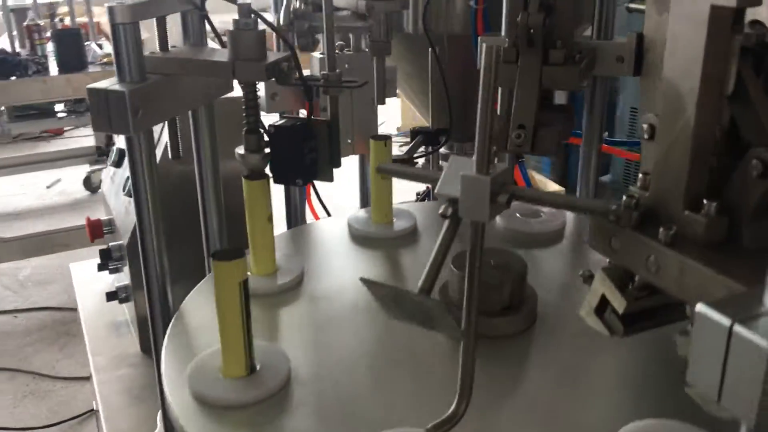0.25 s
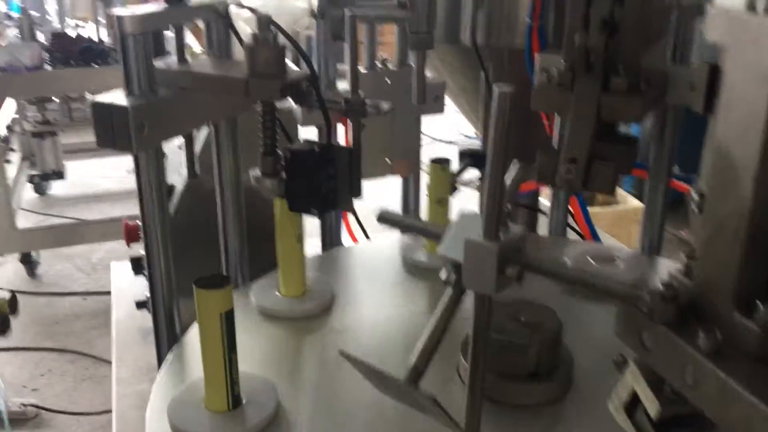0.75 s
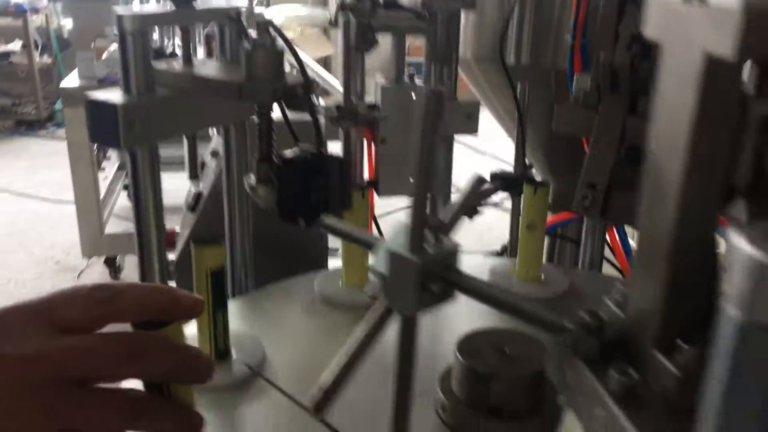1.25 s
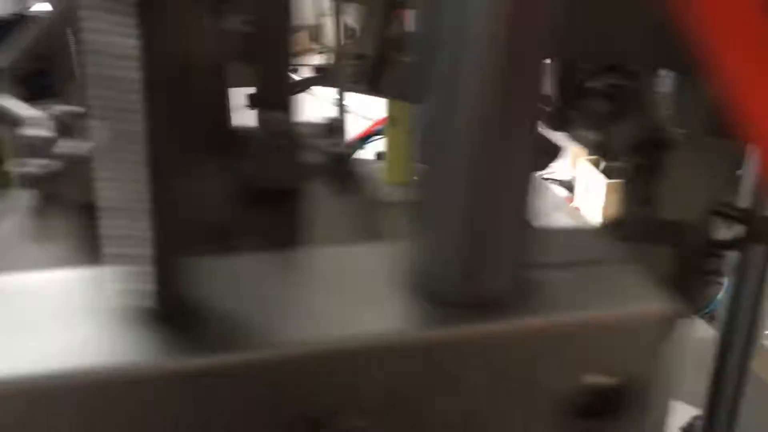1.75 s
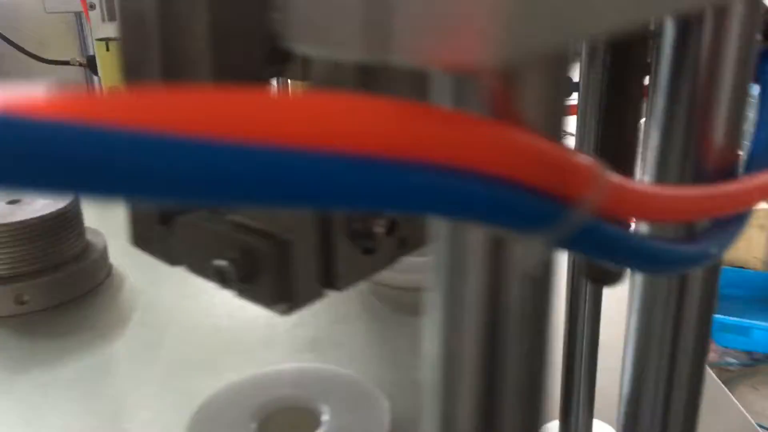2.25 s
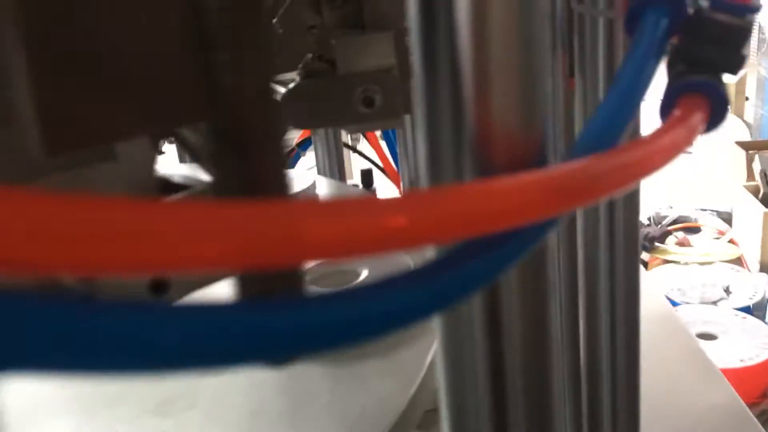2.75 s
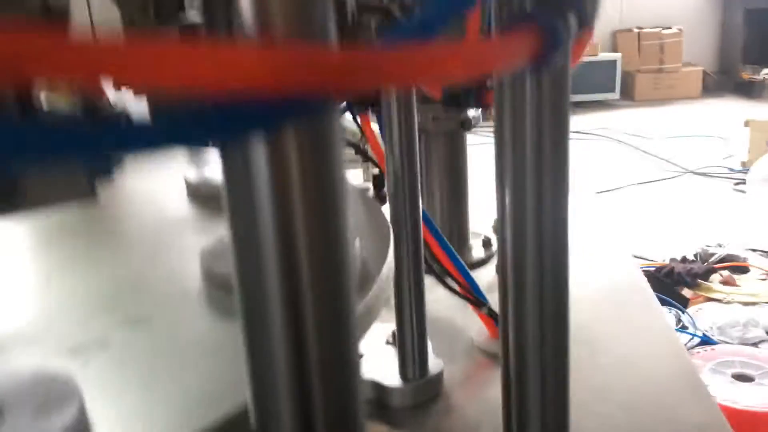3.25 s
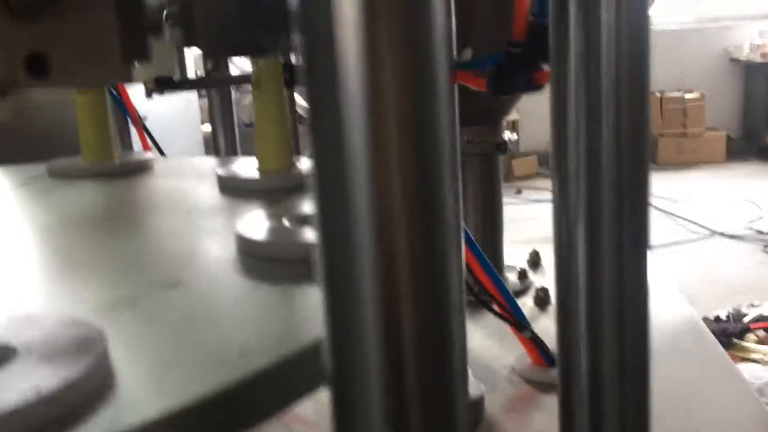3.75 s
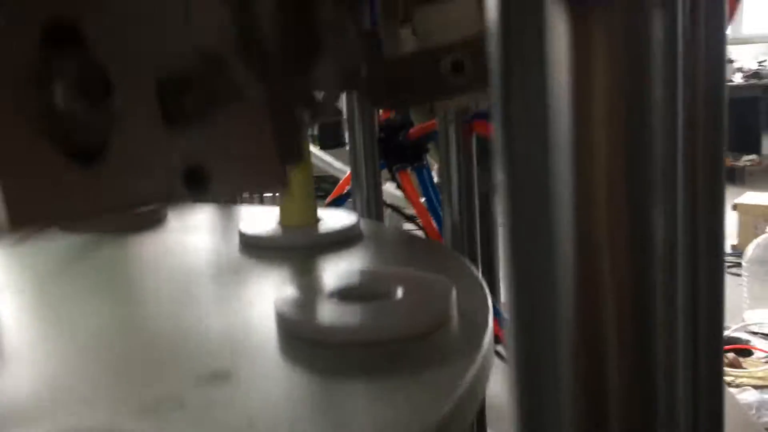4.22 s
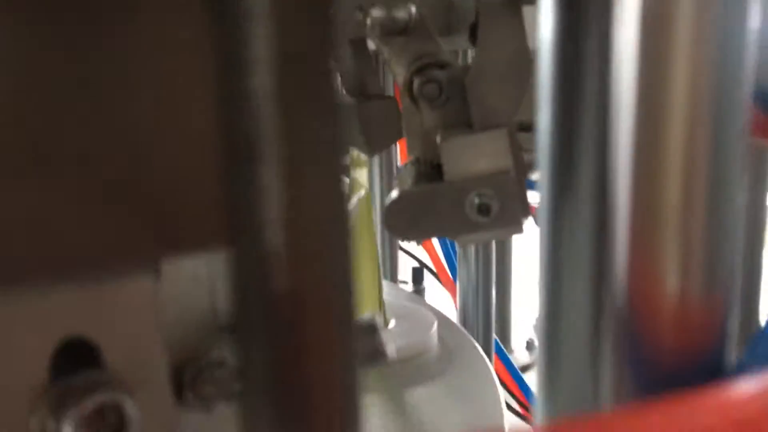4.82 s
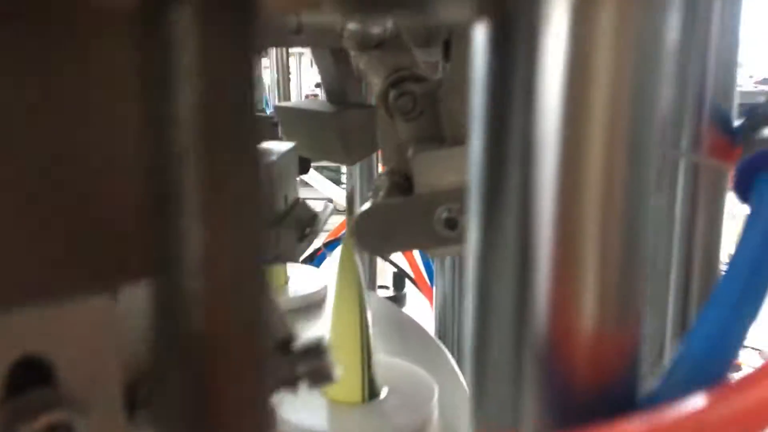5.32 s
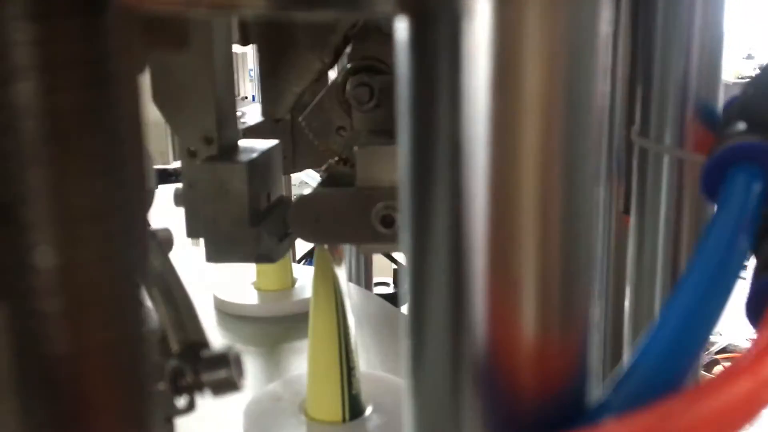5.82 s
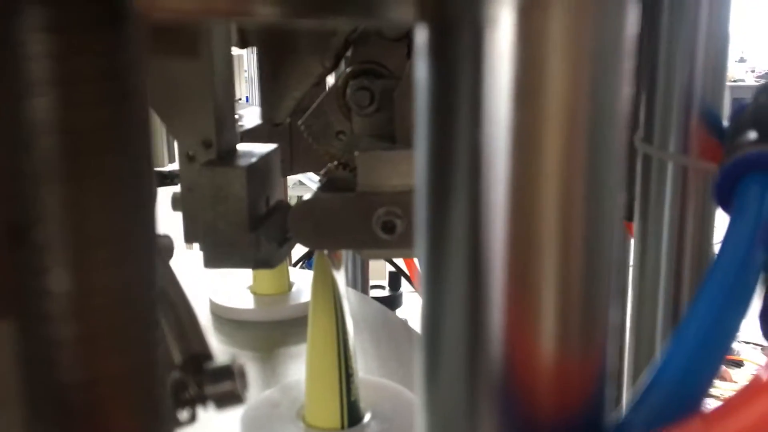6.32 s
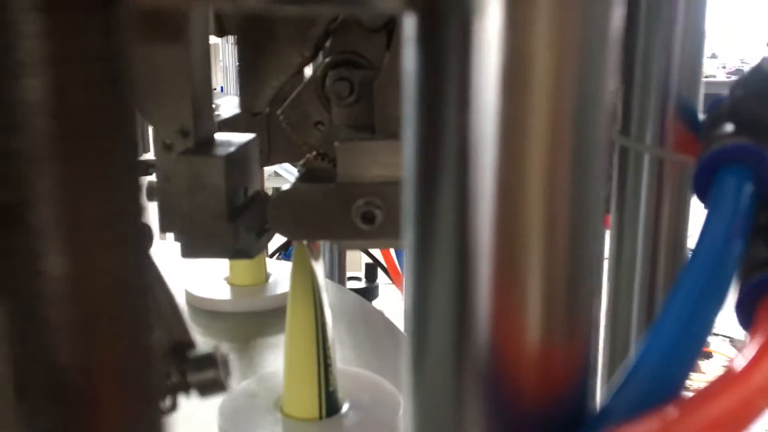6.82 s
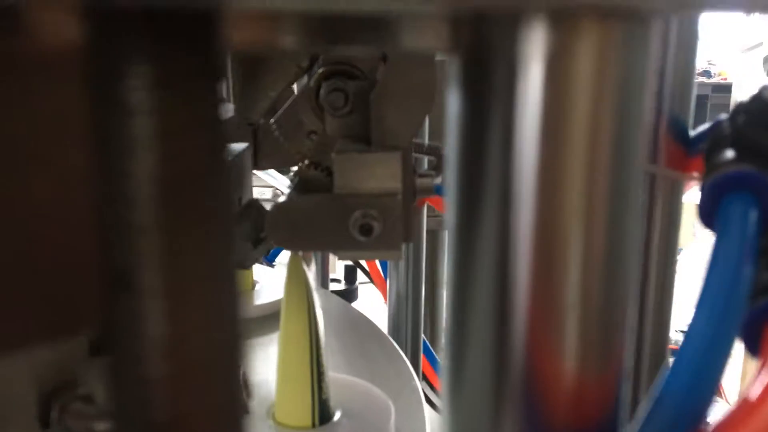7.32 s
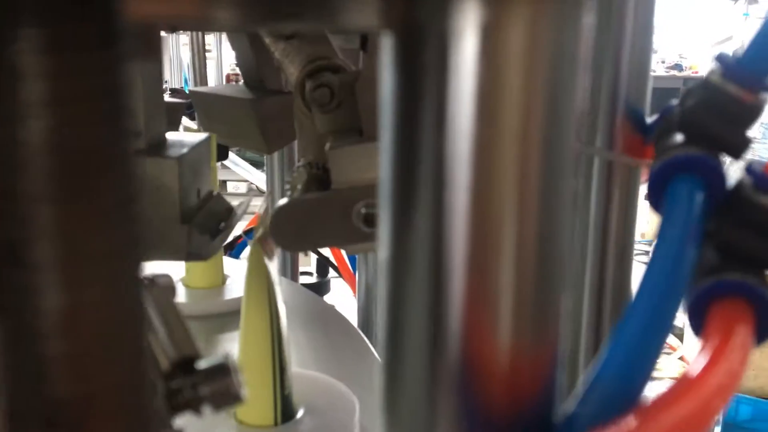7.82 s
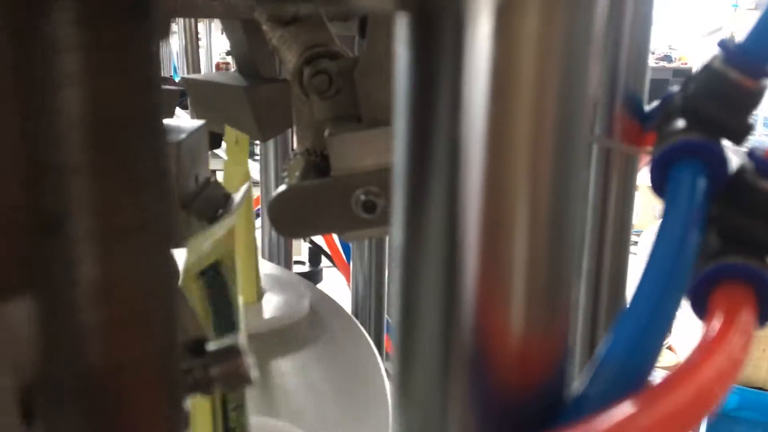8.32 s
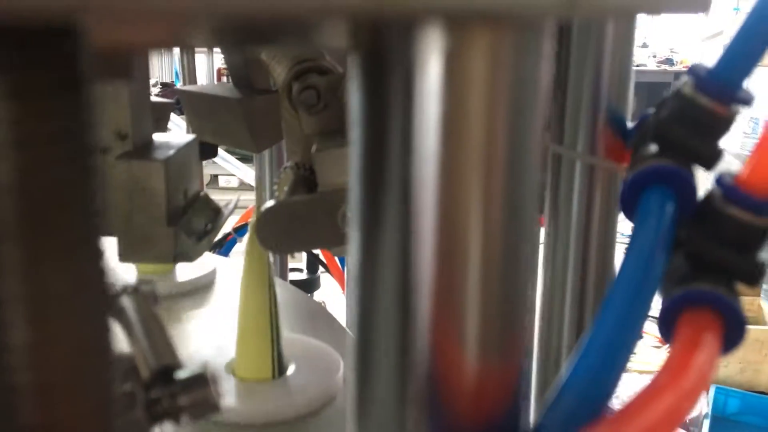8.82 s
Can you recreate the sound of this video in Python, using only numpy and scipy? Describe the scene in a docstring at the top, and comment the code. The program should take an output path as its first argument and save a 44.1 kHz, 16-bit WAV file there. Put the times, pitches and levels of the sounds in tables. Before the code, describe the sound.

An air-driven machine alternates two strokes: a lifting blast with a bright jaw clank and hard landing blows, then a pressing blast with clank and rapid metallic slams. Short spurts of air and a few dry hollow ticks fill the gaps. The microphone is very close, the impacts abrupt and nearly overloading, with the large hall ringing behind and constant soft rumble, hum and thin whine.

```python
"""Factory hall: a rotary tube filling and sealing machine runs, heard from close by.
Each cycle has two strokes: the stations lift off the tubes, then press down on them. At each stroke a valve
dumps air (coloured noise), jaws clank (damped modes) and cylinders slam home on the steel frame (noise bursts).
Hollow taps (modes and ticks) and small puffs (noise) fall in between, over rumble, motor hum and drive whine."""
import sys
import numpy as np
from scipy import signal
from scipy.fft import rfft, irfft, next_fast_len
from scipy.io import wavfile
from scipy.ndimage import uniform_filter1d, minimum_filter1d, map_coordinates

SR = 44100
rng = np.random.default_rng(int(sys.argv[2]) if len(sys.argv) > 2 else 0)


def materialize(psi):
    """Save the field psi as 16-bit PCM at rate SR to the path in sys.argv[1].

    A 1-D psi becomes a single channel; in a 2-D psi each row is a channel.
    """
    bounded = np.clip(np.atleast_2d(psi).T, -1, 1)
    quanta = np.round(bounded * 32767).astype(np.int16)
    wavfile.write(sys.argv[1], SR, quanta)


N = 399987
CYCLE_S, FIRST_LIFT_S, FIRST_PRESS_S = 3.656, 0.083, 1.904


def amp(db):
    """Decibels to gain."""
    return 10 ** (np.asarray(db) / 20)


def unit(x):
    """Scale to rms 1."""
    return x / np.sqrt(np.mean(x ** 2) + 1e-20)


def along(points, hz):
    """Interpolate (Hz, value) points on a log frequency axis."""
    point_hz, values = np.transpose(points)
    return np.interp(np.log(hz + 1), np.log(point_hz + 1), values)


def filtered(x, response):
    """Multiply the spectrum of x by a response, a function of Hz."""
    size = x.shape[-1]
    padded = next_fast_len(size + 8192)
    hz = np.fft.rfftfreq(padded, 1 / SR)
    return irfft(rfft(x, padded) * response(hz), padded)[:size]


def noise(spectrum, size):
    """Noise of rms 1, shaped by (Hz, relative dB) points."""
    return unit(filtered(rng.standard_normal(size), lambda hz: amp(along(spectrum, hz))))


def bump(hz, centre_hz, width_hz):
    """A resonance peak of height 1."""
    return 1 / (1 + (2 * (hz - centre_hz) / width_hz) ** 2)


def boom(modes, size):
    """Noise of rms 1 ringing in (Hz, width Hz, dB) resonances; the deepest bass does not radiate."""
    def response(hz):
        resonances = sum(amp(db) * bump(hz, centre_hz, width_hz) for centre_hz, width_hz, db in modes)
        return resonances * hz ** 4 / (hz ** 4 + 45 ** 4)
    return unit(filtered(rng.standard_normal(size), response))


def wobble(knots_per_s):
    """A smooth random curve through random knots."""
    knots = rng.standard_normal(int(N * knots_per_s / SR) + 4)
    return map_coordinates(knots, [np.arange(N) * knots_per_s / SR])


def flutter(size, depth_db, knots_per_s):
    """An uneven gain of rms 1."""
    knots = rng.standard_normal(int(size * knots_per_s / SR) + 2)
    position = np.arange(size) * knots_per_s / SR
    return unit(amp(depth_db * np.interp(position, np.arange(len(knots)), knots)))


def fade(t, attack_s, t60_s):
    """A quick rise and an exponential decay."""
    return (1 - np.exp(-t / attack_s)) * np.exp(-np.log(1000) * t / t60_s)


def ring(modes, t):
    """Damped (Hz, dB, t60 s) modes, struck at slightly new strengths each time."""
    total = np.zeros(len(t))
    for hz, db, t60_s in modes:
        strength = amp(db + rng.normal())
        total += strength * fade(t, 0.00038, t60_s) * np.sin(2 * np.pi * (hz * t + rng.random()))
    return total


def add(track, start_s, sound):
    """Mix a sound into the track."""
    part = track[max(round(start_s * SR), 0):][:len(sound)]
    part += sound[:len(part)]


def strokes(first_s):
    """The times at which one kind of stroke comes round."""
    return np.arange(first_s, N / SR, CYCLE_S)


def every_cycle(first_s, pattern):
    """A stroke's events, repeated each cycle."""
    return [(start_s + delay_s, *rest) for start_s in strokes(first_s) for delay_s, *rest in pattern]


# Exhaust muffler spectrum. Each row: frequency in Hz, relative density in dB.
MUFFLER_SPECTRUM = [(120, -64), (200, -5.5), (304, -7), (516, -10), (1540, -6.5), (1690, -9.5), (1950, -6),
                    (2660, -6), (4350, -2), (4950, -4.5), (6870, -1), (7800, -4), (8870, -5.5),
                    (14000, -7.5), (15600, -10)]
# Exhaust port resonances. Each row: centre in Hz, width in Hz, gain in dB before the stroke's colour factor.
PORT_RESONANCES = [(4300, 160, 2.5), (4450, 77, 0.5), (7000, 460, 1.5), (7650, 1970, -5), (8520, 310, 6),
                   (9250, 120, 6.5), (10400, 400, 1), (11100, 80, 4), (11300, 90, 5.5), (14090, 100, 4)]
# Frame recoil as the valve opens. Each row: frequency in Hz, relative level in dB, t60 in s.
KICK_MODES = [(77.6, 2.5, 0.09), (120, -7.5, 0.081), (176, -11.5, 0.13), (274, 0.5, 0.02), (560, 8, 0.012)]
# Main exhaust per stroke. Columns: level in dB, open time in s, pressure fall in dB/s,
# kick in dB relative to the level, port colour factor.
LIFT_AIR = (-23.5, 0.3245, 17.5, 2, 1.32)
PRESS_AIR = (-22.5, 0.2948, 23.5, 5.5, 0.9)


def exhaust(lead_s=0.035, opening_db_per_s=700, closing_db_per_s=190, surge_db=2.5, flutter_db=1.5):
    """The valve opens with a kick; the jet weakens as the pressure falls, then shuts."""
    out, t = np.zeros(N), np.arange(SR) / SR
    age_s = t - lead_s
    for first_s, air in ((FIRST_LIFT_S, LIFT_AIR), (FIRST_PRESS_S, PRESS_AIR)):
        level_db, open_s, fall_db_per_s, kick_db, colour = air
        flow_db = opening_db_per_s * np.minimum(age_s, 0) - fall_db_per_s * age_s
        flow_db -= closing_db_per_s * np.maximum(age_s - open_s, 0)
        flow_db += surge_db * np.exp(-np.abs(age_s) / 0.019)

        def port(hz):
            return amp(colour * sum(db * bump(hz, centre, width) for centre, width, db in PORT_RESONANCES))

        for stroke_s in strokes(first_s):
            jet = filtered(noise(MUFFLER_SPECTRUM, len(t)), port)
            jet *= flutter(len(t), flutter_db, knots_per_s=120)
            add(out, stroke_s - lead_s, amp(level_db + flow_db) * jet)
            kick = ring(KICK_MODES, t) * (1 - np.exp(-t / 0.0058))
            add(out, stroke_s - 0.011, amp(level_db + kick_db) * kick)
    return out


# Stops hit on every such stroke. Each row: delay after the valve opens in s, blow level in dB, hardness 0-1,
# rattle t60 in s, strongest ring in Hz.
LIFT_STOPS = [(.113, -20, 0.52, 0.06, 1420), (0.281, -24, 0.26, 0.094, 1170)]
PRESS_STOPS = [(0.054, -22, 0.65, 0.076, 1170), (.207, -15.5, 0.44, 0.27, 1050),
               (.296, -12, 0.41, 0.094, 950), (.319, -12.5, 0.79, 0.08, 1260), (.381, -9.5, .98, .12, 627),
               (.561, -20, .08, 0.15, 1061)]
# Lifted head landing in a few blows, different each time. Each row: start in s, then as for the stops.
LANDINGS = [(.435, -17.5, .35, 0.32, 1630), (.472, -11.5, 0.67, 0.11, 850), (.509, -19.5, .05, .14, 650),
            (.535, -12.5, 0.91, 0.096, 3270), (4.097, -9, 0.55, 0.092, 960),
            (4.130, -6.5, 0.76, 0.094, 677), (4.154, -21, 0.04, 0.3, 716), (4.191, -10.5, 0.9, 0.048, 1890),
            (7.794, -6, 0.66, .06, 1620), (7.858, -4.5, 0.77, 0.14, 900), (7.916, -6.5, 0.46, 0.23, 1014)]
# What a blow of hardness 0 and 1 sets off. Columns: base boom, frame thud, crack, in dB before their trims.
SOFT_BLOW = (-0.8, 5.4, -29)
HARD_BLOW = (-22, -12, 1.5)
# Linkage and crack spectra. Each row: frequency in Hz, relative density in dB.
LINKAGE_SPECTRUM = [(200, -10), (400, -1), (480, -6), (630, 7), (820, -2), (990, 3), (1300, -0.5),
                    (1900, 0.5), (2600, -2.5), (3300, -9), (6000, -14), (12000, -21)]
CRACK_SPECTRUM = [(1000, -70), (3000, 14.5), (6000, 15), (10000, 9), (16000, 10)]
# Resonances of machine base and steel frame. Each row: centre in Hz, width in Hz, relative level in dB.
BASE_RESONANCES = [(64.3, 6, 2), (88.8, 28, 9.5), (131.4, 16, -1.5)]
FRAME_RESONANCES = [(184.8, 34, 1.5), (254, 34, 2.5), (310.4, 31, 3.5), (334, 26, -6), (385, 74, -12.5),
                    (464, 130, -17)]


def slams(base_trim_db=-5, thud_trim_db=-4, rattle_db=-5, impact_db=-1, crack_trim_db=-3, base_t60_s=0.75,
          thud_t60_s=0.31, impact_t60_s=0.018, crack_t60_s=0.031, ring_db=10, sharpness=6):
    """A piston hits its stop: hard impact, linkage rattle, frame thud, slow base boom, crack."""
    out, t = np.zeros(N), np.arange(SR // 2) / SR
    blows = every_cycle(FIRST_LIFT_S, LIFT_STOPS) + every_cycle(FIRST_PRESS_S, PRESS_STOPS) + LANDINGS
    for start_s, level_db, hardness, rattle_t60_s, ring_hz in blows:
        mix_db = np.array(SOFT_BLOW) + np.clip(hardness, 0, 1) * np.subtract(HARD_BLOW, SOFT_BLOW)
        base_db, thud_db, crack_db = mix_db + [base_trim_db, thud_trim_db, crack_trim_db]
        linkage = unit(filtered(noise(LINKAGE_SPECTRUM, len(t)),
                                lambda hz: amp(ring_db * bump(hz, ring_hz, ring_hz / sharpness))))
        impact = amp(impact_db) * fade(t, 0.00088, impact_t60_s)
        rattle = amp(rattle_db) * fade(t, 0.0055, rattle_t60_s)
        blow = (impact + rattle) * linkage
        blow += amp(base_db) * fade(t, 0.013, base_t60_s) * boom(BASE_RESONANCES, len(t))
        blow += amp(thud_db) * fade(t, 0.0028, thud_t60_s) * boom(FRAME_RESONANCES, len(t))
        blow += amp(crack_db) * fade(t, 0.000415, crack_t60_s) * noise(CRACK_SPECTRUM, len(t))
        add(out, start_s, amp(level_db) * blow)
    return out


# Sealing jaw clanks. Each row: start in s, level in dB, strongest ring in Hz, rebound in dB relative to the
# first contact, clean ring in dB before its trim.
CLANKS = [(.262, -3, 1660, -7, 2.5), (2.108, -5.5, 2280, -21, -17), (3.805, -10, 1260, -16, -5.5),
          (3.914, -9, 1250, 2, -5), (5.763, -10.5, 2170, -21, -25), (7.467, -14, 1660, -1, -4.5),
          (7.571, -9.5, 1510, 5, 5)]
# Jaw modes. Each row: frequency in Hz, relative level in dB, t60 in s.
JAW_MODES = [(1114, -2, 0.054), (1530, -21, 0.038), (1651, 0.5, 0.087), (1910, -31, 0.032),
             (2090, -2, 0.065), (2378, -0.5, 0.094), (2830, -6, 0.12), (3172, -6.5, 0.085),
             (4150, -31, .05)]


def jaws(ring_trim_db=-8.0, clash_db=-3, focus_db=10.5, width_hz=450, rebound_s=0.0082, clash_t60_s=0.047):
    """Steel jaws meet and rebound once; where they touch decides which modes ring most."""
    out, t = np.zeros(N), np.arange(SR // 3) / SR
    contact_spectrum = [(200, 0.5), (1000, 0.5), (3000, 1), (4500, 4), (12000, -24)]
    for start_s, level_db, ring_hz, rebound_db, ring_db in CLANKS:
        modes = [(hz, db + focus_db * bump(hz, ring_hz, width_hz), t60_s) for hz, db, t60_s in JAW_MODES]
        add(out, start_s, amp(level_db + ring_trim_db + ring_db) * ring(modes, t))
        for delay_s, blow_db in ((0, 0), (rebound_s, rebound_db)):
            contact = noise(contact_spectrum, len(t))
            clash = unit(filtered(contact, lambda hz: np.sqrt(bump(hz, ring_hz, width_hz))))
            clash *= fade(t, 0.0011, clash_t60_s)
            add(out, start_s + delay_s, amp(level_db + blow_db + clash_db) * clash)
    return out


# Hollow taps. Each row: start in s, level in dB, lowest mode in Hz, brightest band in Hz,
# lowest mode offset in dB, upper modes offset in dB.
TAPS = [(1.3748, -24, 562, 4700, -5, -4), (1.405, -13, 612, 1820, 1.5, -15),
        (1.431, -16, 601, 5200, -7, -3), (1.437, -13.5, 591, 3320, -13, -9),
        (1.796, -8.5, 562, 3040, -5, -7.5), (5.386, -14.5, 575, 1660, -2, -9),
        (5.3887, -16.5, 554, 5600, -28, -2.5), (5.713, -15.5, 568, 1670, 1, -8.5),
        (7.727, -6, 692, 2430, 2.5, -21)]
# Roughly odd modes of a short tube. Each row: multiple of the lowest mode, relative level in dB, t60 in s.
HOLLOW_MODES = [(1, -8.5, 0.14), (3.02, -0.5, 0.078), (5.2, -9.5, 0.07), (9.5, -3.5, .02)]


def taps(tick_db=1, ring_db=-1, focus_db=9, tick_t60_s=0.019, width_hz=800):
    """Sharp taps on something small and hollow, each favouring its own band; returns rings and ticks."""
    rings, ticks, t = np.zeros(N), np.zeros(N), np.arange(SR // 4) / SR
    contact_spectrum = [(250, -47), (600, 2.5), (2500, -5.5), (5800, -7.5), (7500, -11), (11000, -1), (16000, -5)]
    for start_s, level_db, low_hz, bright_hz, low_db, upper_db in TAPS:
        modes = []
        for i, (multiple, db, t60_s) in enumerate(HOLLOW_MODES):
            hz = multiple * low_hz
            offset_db = upper_db if i else low_db
            modes.append((hz, db + offset_db + focus_db * bump(hz, bright_hz, width_hz), t60_s))
        contact = noise(contact_spectrum, len(t))
        tick = unit(filtered(contact, lambda hz: np.sqrt(bump(hz, bright_hz, width_hz))))
        add(rings, start_s, amp(level_db + ring_db) * ring(modes, t))
        add(ticks, start_s, amp(level_db + tick_db) * tick * fade(t, 0.0008, tick_t60_s))
    return rings, ticks


# Vents after every pressing stroke. Each row: delay after the valve opens in s, level in dB.
PRESS_PUFFS = [(.59, -26), (.758, -34.5)]
# Other vent puffs: one about 0.9 s after each lift stroke, the rest scattered.
# Each row: start in s, level in dB.
OTHER_PUFFS = [(.922, -46), (.975, -37), (1.282, -43.5), (2.874, -34.5), (4.643, -52), (6.775, -41.5),
               (8.289, -44)]
# Vent spectrum. Each row: frequency in Hz, relative density in dB.
VENT_SPECTRUM = [(400, 8), (2500, 0.5), (6000, -7), (9000, -2), (13000, -6.5), (16000, -16)]


def puffs(t60_s=0.12):
    """Small valves let off short spurts of air."""
    out, t = np.zeros(N), np.arange(SR // 2) / SR
    for start_s, level_db in every_cycle(FIRST_PRESS_S, PRESS_PUFFS) + OTHER_PUFFS:
        add(out, start_s, amp(level_db) * fade(t, 0.0041, t60_s) * noise(VENT_SPECTRUM, len(t)))
    return out


def tones(lines, drift_rad=0.14):
    """Steady (Hz, rms dB) sines whose phases drift slowly."""
    t, total = np.arange(N) / SR, np.zeros(N)
    for hz, db in lines:
        phase = 2 * np.pi * (hz * t + rng.random()) + drift_rad * wobble(4.2)
        total += amp(db) * np.sqrt(2) * np.sin(phase)
    return total


# Motor hum; inverter switching tone and sidebands. Each row: frequency in Hz, rms level in dB before the trim.
HUM_LINES = [(70, -63), (686, -62.5), (840, -57), (1466, -65)]
WHINE_LINES = [(9771, -64.5), (9835, -61.5), (9868, -62), (9954, -71), (10017, -55.5), (10051, -82),
               (10131, -81), (10229, -74), (10449, -82)]
# Noise around the whine; rumble. Each row: frequency in Hz, relative density in dB.
SKIRT_SPECTRUM = [(7000, -52), (9200, -17), (9600, -14), (9900, -2), (10100, 1.5), (10350, -12),
                  (11000, -24.5), (15000, -50)]
RUMBLE_SPECTRUM = [(15, -45), (25, -14), (66, 2), (266, -12.5), (356, -14), (392, -12), (453, -19.5),
                   (511, -15), (828, -17.5), (890, -16.5), (1370, -19.5), (1510, -19.5), (2280, -27),
                   (8000, -44.5), (10400, -72), (17600, -120)]


def motor(whine_trim_db=-1, skirt_db=-55, hum_trim_db=-1, rumble_db=-43.7, rumble_fall_db_per_s=0.29,
          swell_s=3.52, swell_db=5, swell_width_s=0.12):
    """Rumble and hum of the running machinery, a faint leak, and the whine of the motor's inverter."""
    t = np.arange(N) / SR
    whine = amp(whine_trim_db) * tones(WHINE_LINES) + amp(skirt_db) * noise(SKIRT_SPECTRUM, N)
    whine *= amp(0.18 * wobble(2.9))
    drone = unit(filtered(noise(RUMBLE_SPECTRUM, N), lambda hz: hz ** 2 / (hz ** 2 + 35 ** 2)))
    # the rumble fades slowly and swells once, briefly
    level_db = rumble_db - rumble_fall_db_per_s * t + 0.27 * wobble(8.2)
    level_db += swell_db * np.exp(-((t - swell_s) / swell_width_s) ** 2)
    leak = amp(-68.5) * noise([(2000, -10), (5000, -7), (11000, 5), (16000, -8)], N)
    return whine + amp(level_db) * drone + leak + amp(hum_trim_db) * tones(HUM_LINES)


def plates(x, echo_db, count=10):
    """Weak early echoes from the table and the columns of the machine."""
    echoes = np.zeros(N)
    for delay_s in rng.uniform(0.001, 0.024, count):
        echoes += rng.choice([-1, 1]) * np.pad(x, (round(delay_s * SR), 0))[:N]
    return x + amp(echo_db) * echoes


# Hall decay. Each row: frequency in Hz, t60 in s.
HALL_T60 = [(70, 3.65), (250, 1.14), (600, 1.28), (1500, 1.2), (4000, 1), (8000, 0.72), (15000, 0.33)]


def hall(x):
    """The hall's tail, decaying noise; each frequency dies at its own speed."""
    hz, t, cells = signal.stft(rng.standard_normal(2 * SR), SR, nperseg=256)
    decay = fade(t, 0.0048, along(HALL_T60, hz)[:, None])
    tail = signal.istft(cells * decay, SR, nperseg=256)[1]
    return signal.fftconvolve(x, tail / np.linalg.norm(tail))[:N]


def scene():
    """All stations and the hall, alike in both channels."""
    air, stops, clanks = exhaust() + puffs(), slams(), jaws()
    rings, ticks = taps()
    # the taps are close: the hall gets little of them
    send = amp(-5.0) * air + amp(-13.0) * stops + amp(-21) * clanks + amp(-19) * rings + amp(-13.5) * ticks
    machine = plates(air, echo_db=-13.5) + plates(stops + clanks, echo_db=-18.5)
    mono = machine + rings + ticks + hall(send) + motor()
    return np.array([mono, mono])


def record(dry, ceiling=0.85, release_db_per_s=110, top_hz=15850):
    """A limiter ducks at the loudest blows and recovers; nothing is kept above the band limit."""
    over_db = np.maximum(20 * np.log10(np.abs(dry[0]) / ceiling + 1e-9), 0)
    recovery_db = release_db_per_s * np.arange(N) / SR
    duck_db = np.maximum.accumulate(over_db + recovery_db) - recovery_db
    # duck slightly ahead of each peak, without a step
    gain = uniform_filter1d(minimum_filter1d(amp(-duck_db), size=45), size=45)
    return np.array([filtered(channel, lambda hz: hz < top_hz) for channel in dry * gain])


dry = scene()
out = record(dry)
materialize(out)
```